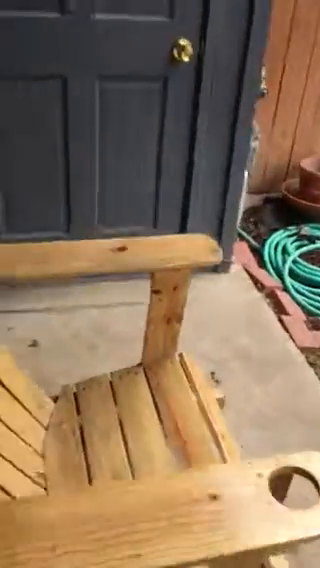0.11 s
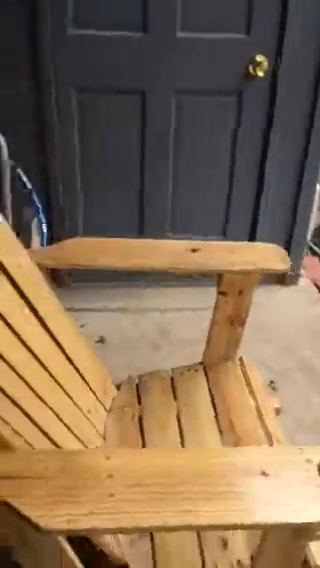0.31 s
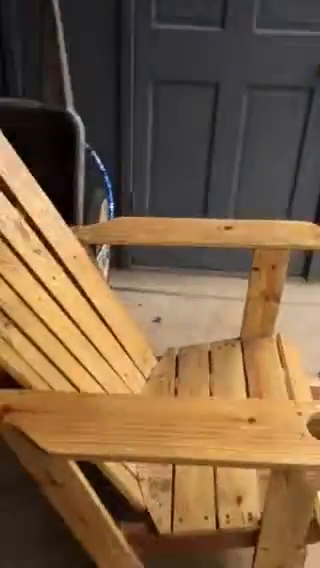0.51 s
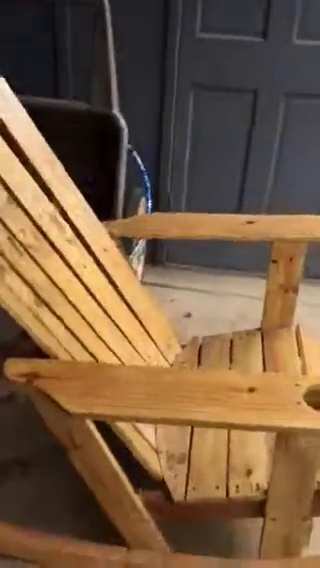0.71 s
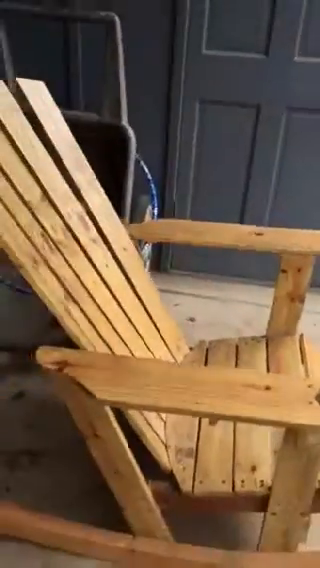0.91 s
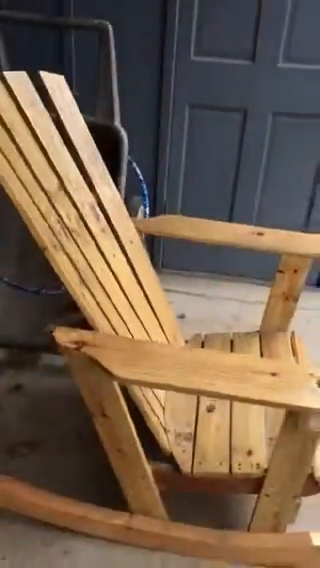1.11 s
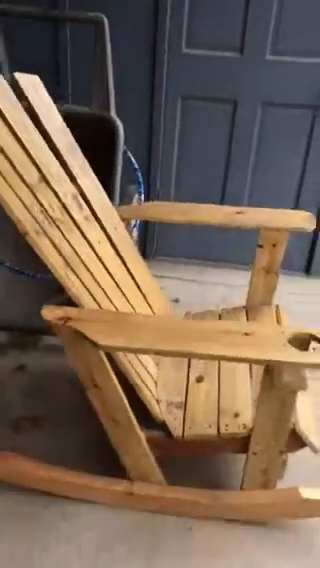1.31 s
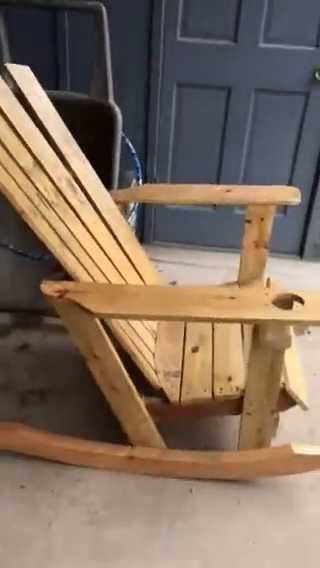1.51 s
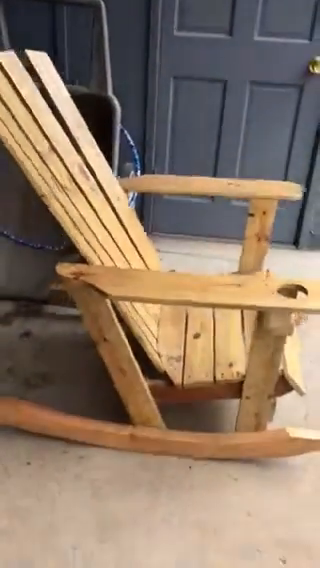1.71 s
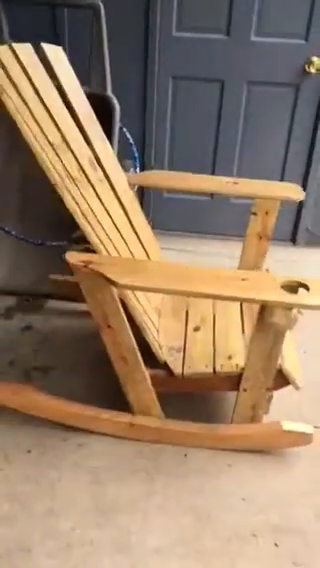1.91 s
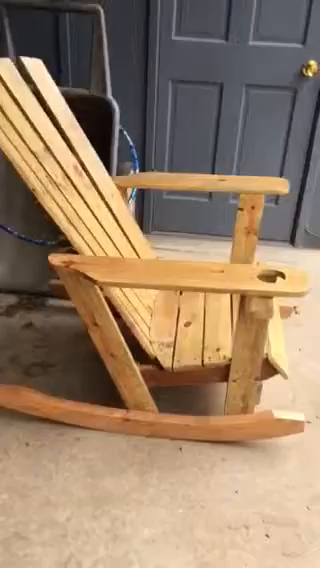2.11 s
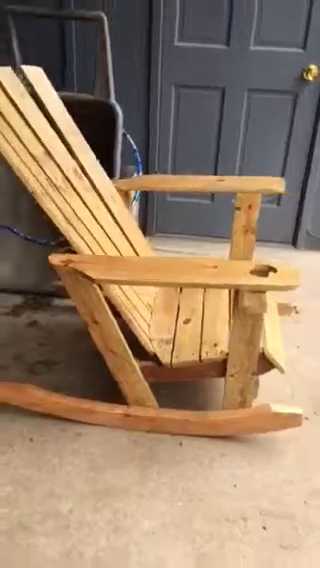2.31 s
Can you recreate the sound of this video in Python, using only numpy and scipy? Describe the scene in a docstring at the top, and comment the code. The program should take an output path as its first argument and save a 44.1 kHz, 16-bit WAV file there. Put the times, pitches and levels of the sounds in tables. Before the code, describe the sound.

Close by on a porch, a wooden rocking chair gives two quick bursts of sharp snaps, followed by quieter clicks and dull thumps of its runners on gritty concrete. Distant outdoor noise and a faint hum lie behind.

```python
"""A wooden rocking chair on a concrete porch, a metre or two from one microphone.
In the first second its joints let go in two loud clusters of snaps, ringing briefly off the walls,
while the runners thump over uneven spots and crunch a little grit. Then come softer ticks among
further thumps, the last just after two seconds. Behind it all lie distant outdoor noise and a low hum;
a thin, far-off high tone shows faintly at the start and again around one second."""
import sys
import numpy as np
from scipy import signal
from scipy.fft import rfft, irfft
from scipy.io import wavfile
from scipy.ndimage import uniform_filter1d

SR = 44100
rng = np.random.default_rng(int(sys.argv[2]) if len(sys.argv) > 2 else 0)


def generate_wav(sig):
    """Save sig (samples, or channels by samples) to the path in sys.argv[1] as 16-bit PCM at SR."""
    pcm = np.round(np.clip(np.atleast_2d(sig).T, -1, 1) * 32767).astype(np.int16)
    wavfile.write(sys.argv[1], SR, pcm)


N = 110250
T = np.arange(N) / SR

# The joints, close by. Each row: start in seconds, joint, body, bite, treble and top in relative dB,
# rise and decay of the chatter in seconds, ring of the board in relative dB.
JOINT_SNAPS = [(.0564, "seat", -75, -73, -76, -76.5, .0002, .0015, -81),
               (.164, "back", -63, -68, -63.5, -67, 0.00022, .0027, -65),
               (0.217, "seat", -63, -51, -39, -43.5, 0.00023, 0.0028, -37),
               (0.2228, "slat", -48.5, -51, -58, -60, 0.0017, 0.0062, -40),
               (0.2479, "back", -47, -33.5, -33, -38.5, 0.00018, 0.0027, -33),
               (0.2532, "back", -34.5, -36.5, -48, -53, 0.0022, 0.0062, -34),
               (.2595, "back", -41, -32, -41.5, -57, 0.00046, 0.0081, -33.5),
               (.4755, "leg", -80, -62.5, -88, -88, .0002, .0008, -59.5),
               (0.5237, "seat", -58, -65, -57, -57, .00043, 0.008, -59),
               (0.5329, "slat", -45.5, -48, -48, -66, 0.004, 0.0095, -54),
               (.5382, "arm", -56, -38, -40, -48.5, 0.0022, 0.0077, -44),
               (.5415, "arm", -45.5, -31.5, -44, -51, 0.00059, 0.0037, -35.5),
               (.5606, "arm", -43.5, -55, -50, -45.5, 0.00027, 0.0021, -44.5),
               (0.627, "arm", -59, -60, -58, -64, .00022, 0.015, -64),
               (0.703, "seat", -72, -81, -63, -63.5, 0.00016, 0.00096, -58.5),
               (0.7155, "seat", -57, -57, -53, -53.5, .0002, 0.0037, -51.5),
               (.7195, "slat", -52.5, -55, -66, -70, 0.00045, .004, -59),
               (1.0451, "leg", -61.5, -58, -54.5, -56, 0.00014, 0.0043, -61),
               (1.078, "seat", -60.5, -59.5, -54.5, -57.5, 0.00054, .0051, -59.5),
               (1.3679, "leg", -79, -66.5, -69.5, -68, .00027, 0.0012, -67),
               (1.389, "arm", -91, -67, -73, -72, .0003, 0.0014, -67),
               (1.462, "leg", -67, -66, -66.5, -68, 0.0014, 0.02, -72),
               (1.49, "leg", -60.5, -58, -65.5, -80, 0.0046, 0.012, -63),
               (1.5133, "leg", -61.5, -51.5, -49.5, -68, .0002, .0028, -53),
               (1.5167, "leg", -51, -48, -72, -70, 0.00018, 0.0013, -46),
               (1.519, "leg", -54, -56.5, -65, -76, 0.00016, 0.00058, -49),
               (1.525, "leg", -58.5, -50, -60, -68, 0.00016, 0.00083, -64),
               (1.8194, "back", -81, -78, -71, -71, 0.0034, 0.0071, -85),
               (1.836, "arm", -73, -93, -75, -72, .0005, 0.0013, -72),
               (1.8728, "back", -65.5, -67.5, -66, -68, 0.0018, 0.0052, -70),
               (2.053, "back", -58.5, -72, -70, -89, 0.00049, 0.02, -72),
               (2.1359, "leg", -69, -71, -77, -81, 0.00017, .002, -74),
               (2.153, "slat", -74, -62, -66, -78, 0.00018, 0.0045, -63),
               (2.239, "arm", -74, -85, -71, -70, 0.0013, 0.012, -76),
               (2.2724, "slat", -63, -70, -67.5, -70.5, 0.0016, 0.008, -65),
               (2.3029, "arm", -64.5, -73, -72.5, -72, .00022, 0.0014, -80)]
# The edges of a snap's body, bite, treble and top bands, in Hz.
SNAP_BAND_EDGES_HZ = [560, 1450, 3900, 9000, 17000]
# The wooden colour of a snap. Each row: frequency in Hz, gain in dB.
SNAP_COLOUR = [(250, -10), (450, 7.5), (700, 5), (1200, 6), (2300, 10.5), (3000, 2.5), (3800, 0.5),
               (5000, -2.5), (6100, 0), (7800, -7.5), (8700, -2), (10800, -6), (12200, -1.5), (14000, -8.5),
               (15500, -5.5)]
# The board at each joint. Each row: frequency in Hz, relative level in dB, 60 dB decay time in seconds.
BOARD_MODES = {"seat": [(898, 2, 0.12), (1693, -6, 0.3), (2100, -1.5, 0.12), (3480, 3.5, .06),
               (5660, -7, 0.074), (6800, 3, 0.024)], "slat": [(867.5, 0, 0.1), (1017, 2, 0.11)],
               "back": [(1234, 3.5, 0.062), (1576, 2, 0.083), (2195, -4, 0.13), (2360, -3.5, .09),
               (3717, -2, 0.042)], "arm": [(1815, -4, 0.14), (1900, 0, 0.054), (2200, 1.5, 0.023),
               (2620, -11, 0.022), (3510, -6, 0.076)], "leg": [(789, -5, 0.15), (1352, -0.5, 0.031),
               (1704, 11.5, 0.018), (1810, -13, .25), (2134, 2, 0.036), (4330, -3.5, 0.034)]}
# The runners on uneven concrete. Each row: start in seconds, frame sway, seat and slats in relative dB,
# length of the push in seconds.
RUNNER_THUMPS = [(0.202, -50.5, -39, -47.5, 0.0046), (.222, -44.5, -50, -43, 0.0015),
                 (0.247, -40.5, -52, -41.5, 0.00024), (.533, -39.5, -33, -39, 0.0044),
                 (0.552, -63, -53, -45, 0.0041), (.582, -44, -43, -51, 0.0018),
                 (0.625, -49, -49.5, -51.5, 0.0037), (0.701, -51, -55, -58.5, 0.00051),
                 (1.075, -34.5, -43.5, -54, 0.0035), (1.10, -37.5, -53, -53.5, 0.0054),
                 (1.343, -46, -39.5, -45.5, 0.015), (1.365, -39, -45.5, -52.5, 0.004),
                 (1.495, -51, -50, -69, 0.012), (1.71, -49.5, -55, -88, 0.014),
                 (1.801, -50, -56.5, -75, 0.0053), (1.866, -44, -45, -63, 0.0054),
                 (2.115, -34.5, -40.5, -49, 0.0057), (2.143, -45, -37.5, -47.5, 0.0074),
                 (2.190, -47.5, -49.5, -61, 0.0048)]
# The chair's modes: one for the frame, two for the seat, the rest for the slats.
# Each row: frequency in Hz, relative level in dB, 60 dB decay time in seconds.
CHAIR_MODES = [(62.9, 0, 0.22), (112.9, 4, 0.16), (129.8, 3, 0.258), (194.6, -17, 0.1), (240.7, -6.5, 0.13),
               (278.2, 1.5, 0.16), (310, -5, 0.26), (356.3, 1, 0.13), (380.2, 0.5, 0.14), (447, -4, 0.13),
               (585, -7.5, 0.097)]
# The crunch at floor level. Each row: time in seconds, level in dB.
GRIT_LEVELS = [(0, -79), (.2, -61), (.36, -60), (.52, -59.5), (.66, -58), (.82, -66), (1.03, -67.5),
               (1.12, -58), (1.25, -73.5), (1.36, -61), (1.55, -67.5), (1.7, -72.5), (1.8, -68.5),
               (1.92, -70), (2.02, -77), (2.08, -61.5), (2.29, -64.5), (2.42, -72)]
# The colour of the crunch. Each row: frequency in Hz, gain in dB.
GRIT_SPECTRUM = [(200, 6), (900, 0), (2000, -5), (4000, -15), (6000, -15.5), (9500, -20), (15500, -23)]
# The ring of the porch walls. Each row: frequency in Hz, 60 dB decay time in seconds.
PORCH_DECAY = [(100, 1), (500, 0.49), (1400, 0.29), (3700, 0.3), (9000, 0.24), (15000, 0.18)]
# Distant noise beyond the porch. Each row: frequency in Hz, gain in dB.
OUTDOOR_SPECTRUM = [(20, -28.5), (35, 0), (55, -2), (90, 1), (135, -7.5), (180, -6), (280, -12), (480, -20),
                    (850, -18.5), (1500, -27), (2600, -37.5), (4500, -41), (9300, -45), (15500, -49)]
# The faint hum behind the chair. Each row: frequency in Hz, level in dB.
HUM_TONES = [(59.2, -60), (129.2, -69), (231.5, -73.5)]
# The swell of one more low tone. Each row: time in seconds, level in dB.
DRONE_LEVELS = [(0, -69), (.6, -55.5), (.8, -55.5), (1.05, -53), (1.35, -66), (1.65, -64), (1.95, -58.5),
                (2.5, -66)]
# Thin tones far off. Each row: start and length in seconds, centre in Hz, level at the crest in dB.
HIGH_TONES = [(-.06, 0.16, 3300, -76.5), (0.786, 0.45, 3080, -77.5)]


def joint_snaps():
    """A joint lets go with a crack and a few milliseconds of chatter, and sets its own board ringing."""
    crack_db, crack_s = -12, 0.00015
    pitch_scatter = 0.004  # the load on a board shifts its pitch from snap to snap
    size = SR // 5
    t = T[:size]
    wood = colour(signal.unit_impulse(N), SNAP_COLOUR)[:size]
    edges = SNAP_BAND_EDGES_HZ
    wood_bands = [band(wood, [low, high], "band", order=4) for low, high in zip(edges, edges[1:])]
    out = np.zeros(N)
    for start, joint, *band_dbs, rise_s, decay_s, ring_db in JOINT_SNAPS:
        slip, crack = rng.standard_normal((2, size))
        chatter = unit(slip * (1 - np.exp(-t / rise_s)) * np.exp(-t / decay_s))
        burst = chatter + amp(crack_db) * unit(crack * np.exp(-t / crack_s))
        snap = sum(amp(db) * unit(conv(burst, part)[:size]) for db, part in zip(band_dbs, wood_bands))
        modes = [(hz * (1 + pitch_scatter * rng.standard_normal()), db, t60)
                 for hz, db, t60 in BOARD_MODES[joint]]
        board = band(ring(modes, size), 760, "high")  # keeps the low thud out of the start of the ring
        add(out, start, (snap + amp(ring_db) * unit(board)) * np.sqrt(SR / 110))
    return out


def runner_thumps():
    """A runner drops over an uneven spot: a soft push and a short rumble shake frame, seat and slats."""
    rumble_db, rumble_rise_s, rumble_decay_s = -5, 0.0036, 0.021
    spread_s = 0.0091  # time a push takes to spread through the frame
    out, size = np.zeros(N), SR // 2
    t = T[:size]
    parts = [ring(modes, size) * (1 - np.exp(-t / spread_s))
             for modes in (CHAIR_MODES[:1], CHAIR_MODES[1:3], CHAIR_MODES[3:])]
    for start, *part_dbs, push_s in RUNNER_THUMPS:
        push = t / push_s * np.exp(-2 * t / push_s)
        rumble = rng.standard_normal(size) * (1 - np.exp(-t / rumble_rise_s))
        rumble = conv(rumble * np.exp(-t / rumble_decay_s), push)
        for part, db in zip(parts, part_dbs):
            knock = unit(conv(push, part)[:size])
            shake = amp(rumble_db) * unit(conv(rumble, part)[:size])
            add(out, start, amp(db) * unit(knock + shake) * np.sqrt(SR / 30))
    return out


def floor_grit():
    """Fine grains are crushed between the rolling runners and the concrete."""
    grains = noise() * amp(np.minimum(3.1 * rng.exponential(size=N), 18))
    crunch = unit(colour(grains, GRIT_SPECTRUM)) * np.sqrt(N)
    return crunch * amp(over_time(GRIT_LEVELS) + 1.7 * wander(110))


def porch(direct):
    """Floor and door reflect from close by, and the walls add a short tail that dulls as it fades."""
    tail_db, early_db, early_decay_s, onset_s = -7.5, -7.5, 0.014, 0.005
    edges = np.geomspace(60, 18000, 12)
    tail = sum(band(noise(), [low, high], "band") * fade(over_pitch(np.sqrt(low * high), PORCH_DECAY))
               for low, high in zip(edges, edges[1:]))
    onset = np.clip(2 * T / onset_s - 1, 0, 1)
    early = noise() * (rng.random(N) < .04) * np.exp(-T / early_decay_s)
    reflections = amp(tail_db) * unit(tail * onset) + amp(early_db) * unit(early * onset)
    return direct + conv(direct, reflections)


def outdoor_air():
    """Low, nearly steady noise reaches the porch from a distance."""
    return unit(colour(noise(), OUTDOOR_SPECTRUM)) * np.sqrt(N) * amp(-57.5 + .5 * wander(6.27))


def low_hum():
    """Behind the chair a faint hum wavers, and one more low tone swells and sinks."""
    def tone(hz):
        wavering_hz = hz * (1 + 0.0116 * wander(6.9))
        return np.sqrt(2) * np.sin(2 * np.pi * np.cumsum(wavering_hz) / SR)
    hum = sum(amp(db + 3.1 * wander(7.67)) * tone(hz) for hz, db in HUM_TONES)
    return hum + amp(over_time(DRONE_LEVELS)) * tone(hz=87.5)


def far_high_tones():
    """A thin high tone, a narrow band of noise, comes and goes far away."""
    width_hz = 470
    out = np.zeros(N)
    for start, length, hz, db in HIGH_TONES:
        tone = unit(band(noise(), [hz - width_hz / 2, hz + width_hz / 2], "band", order=2)) * np.sqrt(N)
        swell = np.sin(np.pi * np.clip((T - start) / length, 0, 1))
        out += amp(db) * tone * swell
    return out


def amp(db):
    return 10 ** (np.asarray(db) / 20)


def unit(x):
    """Scale to an energy of one."""
    return x / np.sqrt(np.sum(x ** 2) + 1e-30)


def noise():
    return rng.standard_normal(N)


def fade(t60):
    return np.exp(-np.log(1000) * T / t60)


def conv(x, response):
    return signal.fftconvolve(x, response)[:N]


def band(x, hz, kind, order=3):
    return signal.sosfilt(signal.butter(order, hz, kind, fs=SR, output="sos"), x)


def over_time(points):
    return np.interp(T, *np.array(points).T)


def over_pitch(hz, points):
    point_hz, values = np.array(points, float).T
    return np.interp(np.log(np.maximum(hz, 1)), np.log(point_hz), values)


def colour(x, points):
    """Causal filter through (Hz, dB) points."""
    gain = amp(over_pitch(np.arange(N // 2 + 1) * SR / N, points))
    cepstrum = irfft(np.log(gain), N)
    cepstrum[1:N // 2] *= 2
    cepstrum[N // 2 + 1:] = 0
    return conv(x, irfft(np.exp(rfft(cepstrum)), N)[:N // 10])


def wander(rate_hz):
    """Smooth random drift with a spread of one."""
    hold = int(SR / rate_hz)
    steps = np.repeat(rng.standard_normal(N // hold + 1), hold)
    drift = uniform_filter1d(uniform_filter1d(steps, hold), hold)[:N]
    return drift / drift.std()


def ring(modes, size):
    """Decaying sines of a struck part."""
    return sum(amp(db) * np.sin(2 * np.pi * hz * T[:size]) * fade(t60)[:size] for hz, db, t60 in modes)


def add(out, start_s, x):
    i = int(start_s * SR)
    out[i:i + len(x)] += x[:N - i]


def scene():
    """The chair close up and the outdoors behind it, in mono; only the snaps ring off the porch."""
    chair = porch(joint_snaps()) + runner_thumps() + floor_grit()
    return (chair + outdoor_air() + low_hum() + far_high_tones())[None]


def record(dry):
    """The microphone drops the deepest bass and cuts the top."""
    low_cut_hz, high_cut_hz = 37.7, 15800
    high_cut = signal.ellip(10, .2, 80, high_cut_hz, fs=SR, output="sos")
    return signal.sosfilt(high_cut, band(dry, low_cut_hz, "high", order=4))


dry = scene()
out = record(dry)
generate_wav(out)
```